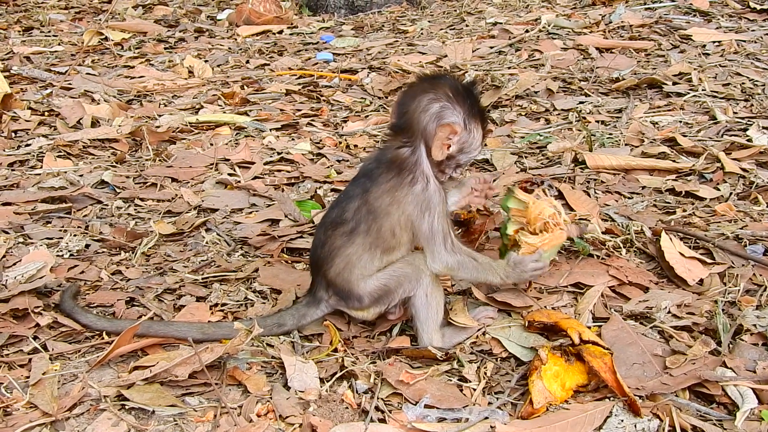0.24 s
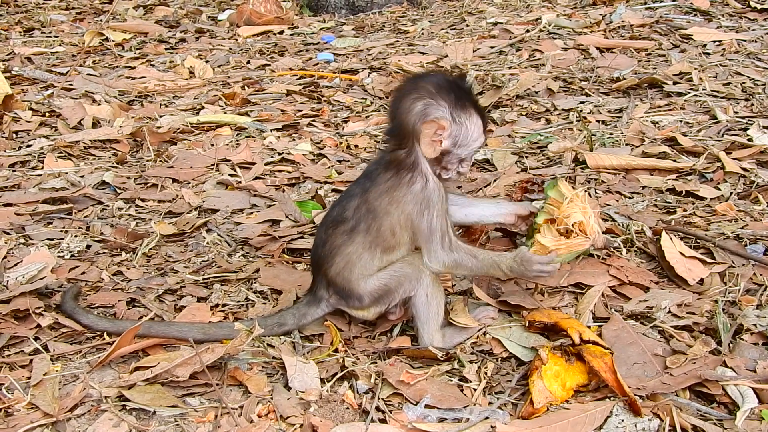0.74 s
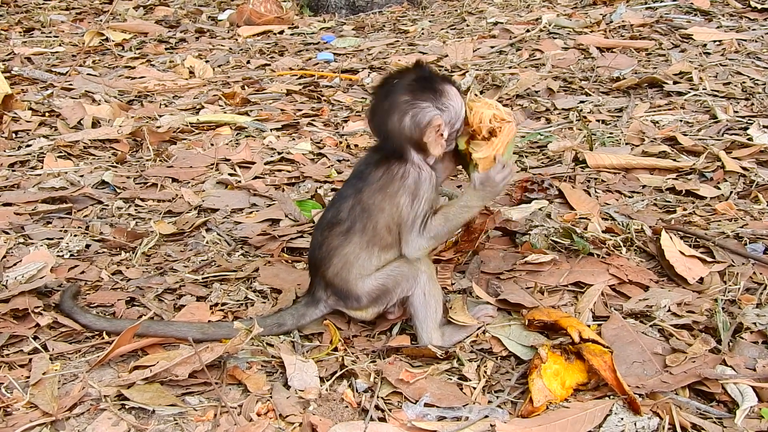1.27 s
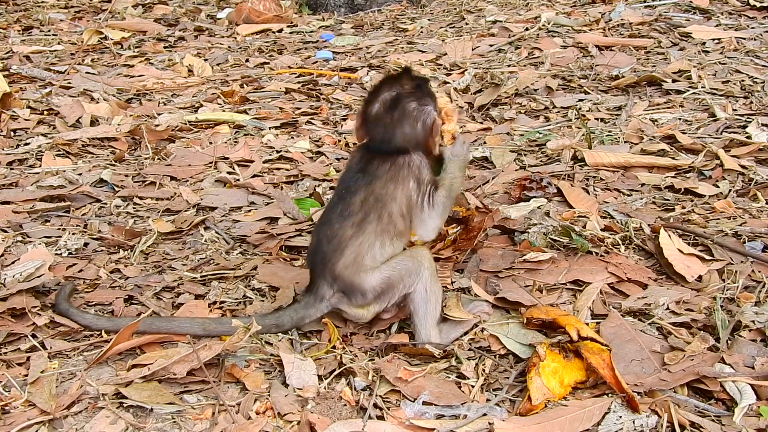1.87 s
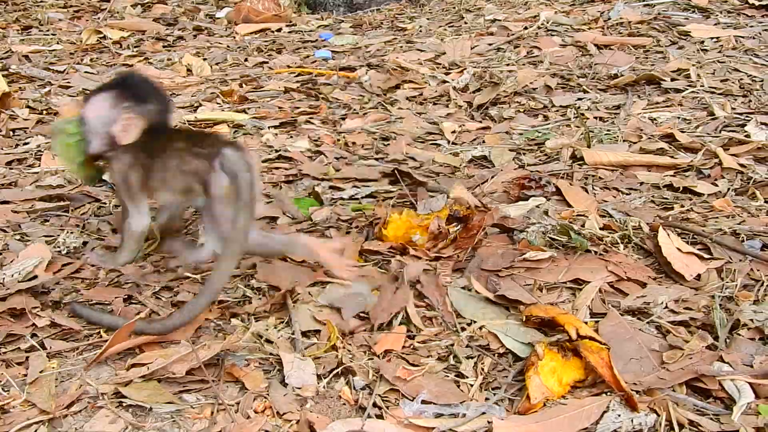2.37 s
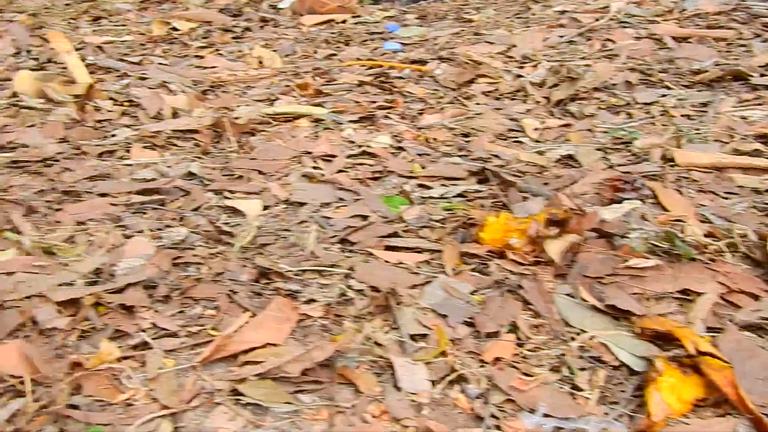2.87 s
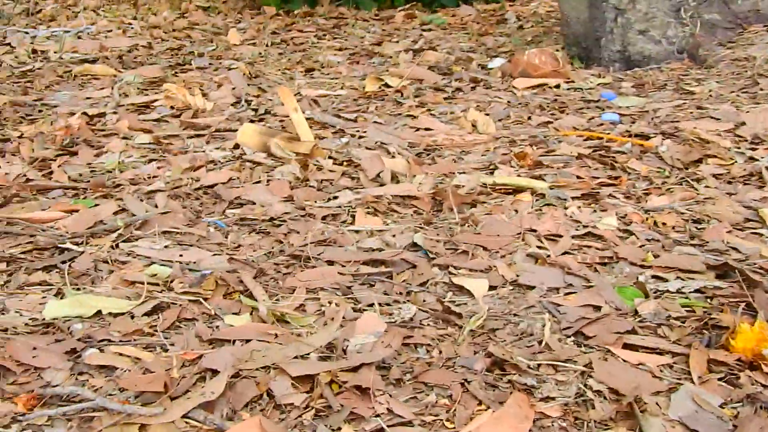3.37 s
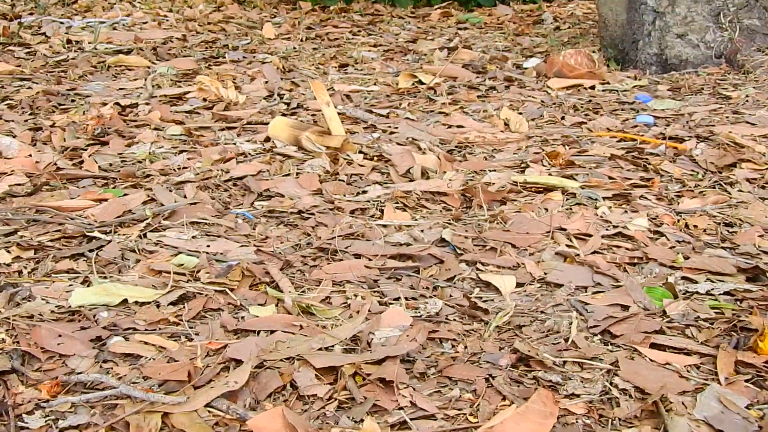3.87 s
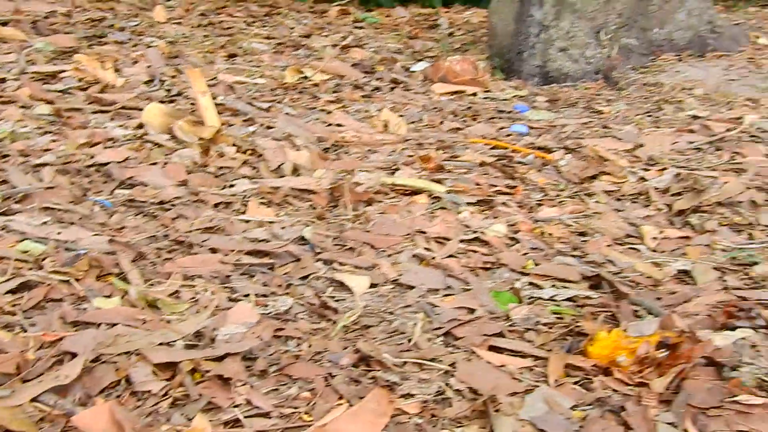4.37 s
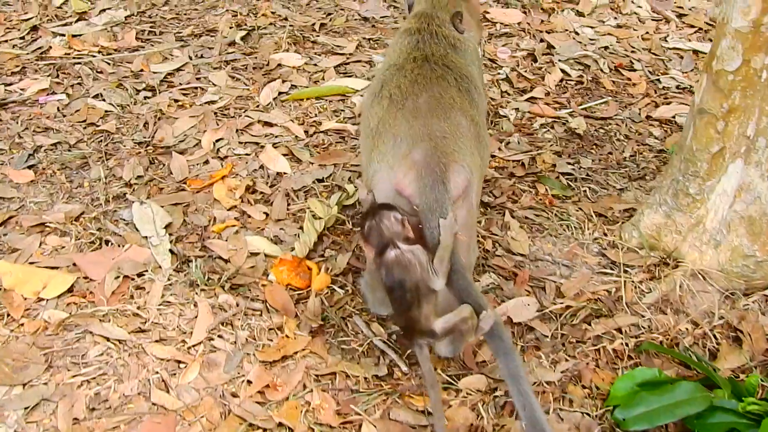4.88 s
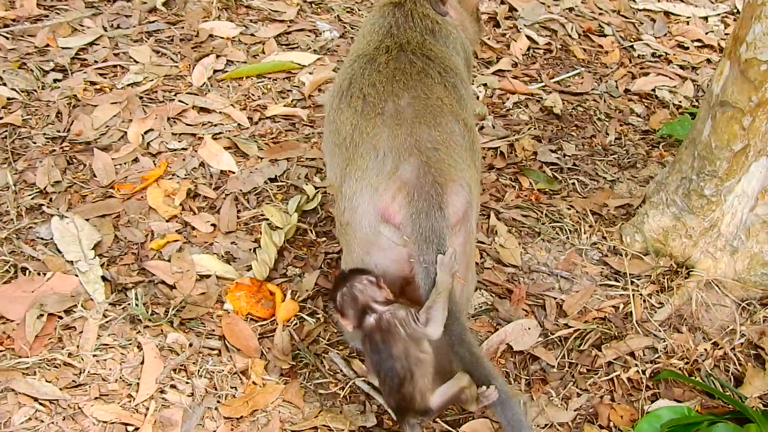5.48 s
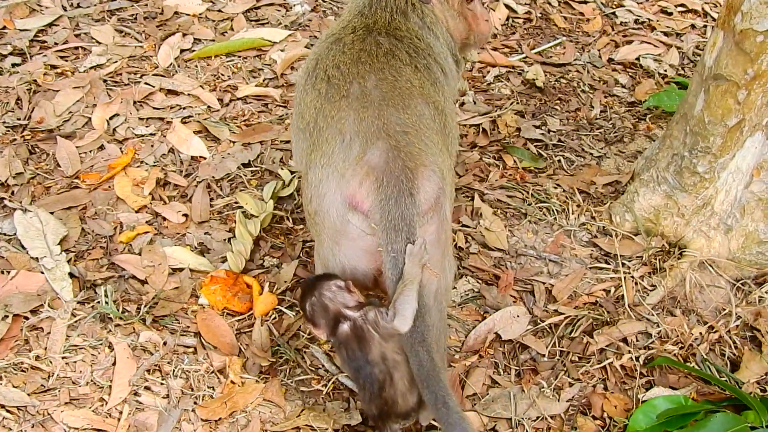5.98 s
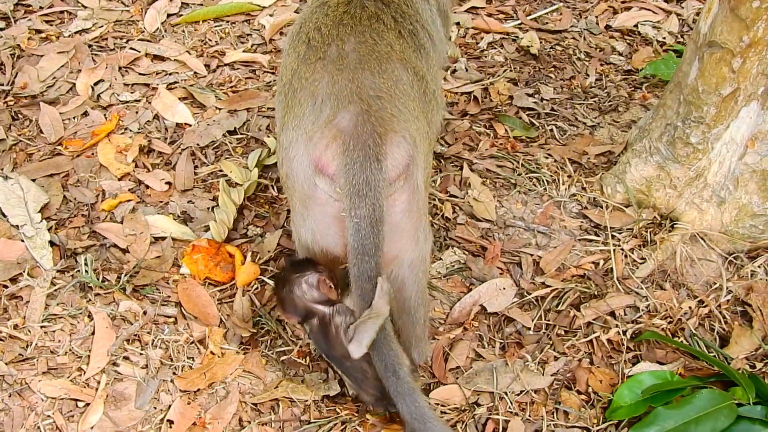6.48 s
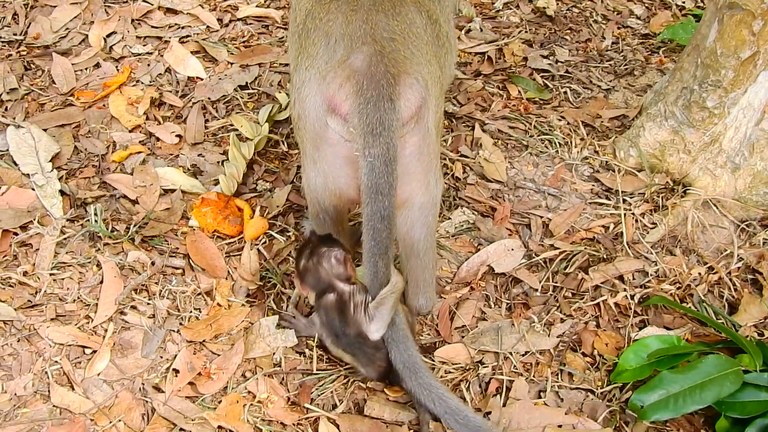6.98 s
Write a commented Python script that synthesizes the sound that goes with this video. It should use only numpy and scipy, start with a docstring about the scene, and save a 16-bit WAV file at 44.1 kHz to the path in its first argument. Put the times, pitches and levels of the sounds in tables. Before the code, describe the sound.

Monkeys scamper over crackling dry leaves near a road, with a thumping motorbike, one short horn toot and a brief dropout.

```python
"""Monkeys in roadside leaves

A single-cylinder motorbike putters through the traffic rumble, each firing thumping its silencer,
louder when the engine labours. A two-note horn toots once and echoes among the trees. Close by,
monkeys scamper and shuffle, crushing and snapping dry leaves, and an insect buzzes briefly.
Everything drops out for half a second, then the bike carries on with a steady low boom."""
import sys
import numpy as np
from scipy import signal
from scipy.fft import rfft, irfft, next_fast_len
from scipy.io import wavfile
from scipy.ndimage import uniform_filter1d, map_coordinates

SR = 44100
rng = np.random.default_rng(int(sys.argv[2]) if len(sys.argv) > 2 else 0)


def transcribe(signal):
    """Save signal, clipped to [-1, 1], as a 16-bit WAV file at the path in sys.argv[1]."""
    frames = np.atleast_2d(signal).T
    limited = np.clip(frames, -1, 1)
    pcm = np.round(limited * 32767).astype(np.int16)
    wavfile.write(sys.argv[1], SR, pcm)


N = 318831

# the engine's firing rate, with a quick drop in pitch just after 2.1 s: (time [s], firing rate [Hz])
REVS = [(0, 36.5), (.92, 33), (1.2, 36), (1.42, 36.2), (1.78, 33), (2.12, 30.6), (2.19, 29.7), (3.5, 30.7),
        (3.98, 31), (4.27, 26.6), (4.78, 34.2), (6.5, 34.8), (6.78, 29.3), (7.2, 28.3)]
# the passing bike's drone at its closest: (multiple of the firing rate, level [dB])
DRONE_PARTIALS = [(2, -32), (4, -35.5), (5, -34.5), (6, -31), (7, -34.5)]
# tone colours, each (frequency [Hz], relative level [dB])
SILENCER_EQ = [(25, -45), (50, -22), (70, -9), (100, 0), (135, 3), (195, -4), (240, -16), (320, -11.5),
               (500, -27), (900, -35.5), (2500, -69.5), (9000, -120)]  # the silencer's resonances
BOOM_EQ = [(25, -12), (55, -6.5), (84, 2), (115, -8), (160, -28.5), (600, -61.5)]  # the part of its thump that booms
BARK_EQ = [(150, -30.5), (260, -6.5), (320, 0.5), (400, -0.5), (470, -1), (680, -5.5), (900, -11.5),
           (1600, -21.5), (4000, -21.5), (12000, -90)]  # the passing engine from nearby
RUMBLE_EQ = [(15, -55), (27, -33), (48, -10.5), (85, -1), (135, 0), (205, -3), (235, -9), (370, -16.5),
             (550, -38.5), (1500, -67.5), (6000, -110)]  # far engines
TYRE_EQ = [(120, -30.5), (250, -1), (380, -0.5), (650, -3), (850, -7), (1350, -10), (1900, -17),
           (3000, -17), (5000, -20.5), (9000, -51.5), (15000, -71.5)]  # tyre roar, also the exhaust puffs
HISS_EQ = [(2500, -31.5), (4000, -11), (5200, -3.5), (6400, 3), (7200, -3.5), (8300, -15.5), (10000, -27),
           (12500, -38), (15700, -51)]  # high hiss
AIR_EQ = [(500, -22.5), (900, -2), (1400, 1.5), (2000, 1), (2700, -0.5), (3900, -4), (5500, -4), (7000, -4),
          (8500, -15), (10500, -27.5), (15700, -44)]  # open air
LEAF_EQ = [(800, -21.5), (2500, -8), (4200, -5), (6400, 3), (7500, 0), (9000, -11.5), (12000, -22.5),
           (15700, -35)]  # crushed dry leaves
SNAP_EQ = [(6500, -0.5), (8500, -7), (12000, -11), (15700, -15.5)]  # the soft top end of a snap
# vehicles rolling by: (closest at [s], passing time [s], tyre level [dB])
PASS_BYS = [(1.58, 0.38, -33.5), (3.15, 0.96, -33), (5.85, .14, -37.5)]
# stereo image, narrow in the bass: (frequency [Hz], left-right likeness [0-1])
STEREO_LIKENESS = [(100, 0.98), (300, 0.99), (700, 0.95), (1400, 0.84), (2800, 0.77), (4500, 0.63),
                   (6500, 0.2), (10000, 0)]
# the road's place in the image: (frequency [Hz], left minus right [dB])
ROAD_PAN = [(40, 2.5), (180, 1.05), (700, 0.5), (1400, 0.7), (2900, 1.5), (5600, 1.9), (10000, -0.5)]
# the horn's two notes: (pitch [Hz], relative level of each harmonic from the first [dB])
HORN_NOTES = [(499.7, [-24.5, 1, -1.5, -2, -4.5, -4.5, -7, -20.5, -11.5, -11, -15, -12, -5.5, -10.5]),
              (424.1, [-22.5, -8.5, -4, -6, 4, -3.5, -3, -12, -12.5, -12, -10, -11.5])]
# reverb among the trees: (frequency [Hz], time to fall 60 dB [s])
TREE_DECAY = [(300, 0.98), (1000, 1.57), (1700, 1.2), (2100, 0.75), (2600, 1.4), (5000, 1.1), (10000, .25)]
# the monkeys' steps and shuffles: (time [s], level [dB], half-width [s])
FOOTFALLS = [(2.36, -40.5, 0.056), (2.5, -37, .04), (2.659, -37, .03), (2.85, -34, .03),
             (2.945, -36.5, 0.019), (3.039, -37.5, .03), (3.183, -37, .025), (3.664, -34.5, .06),
             (4.9, -42, 0.024), (5.144, -42, .03), (5.236, -41.5, .015), (5.678, -43.5, 0.02),
             (5.78, -44.5, 0.055), (6.1, -36.5, .025), (6.723, -39, .05), (6.93, -42, .05)]
# leaves (broad) and twigs (narrow) breaking: (time [s], peak before EQ [dB], pitch [Hz], width [Hz])
LEAF_SNAPS = [(2.471, -12, 6102, 3600), (2.87, -12.5, 6260, 3200), (2.981, -13, 6320, 2400),
              (3.044, -19, 1790, 2000), (3.051, -15, 6330, 2600), (3.296, -19.5, 2200, 1800),
              (3.306, -16, 5001, 1698), (3.782, -18.5, 5850, 1796), (5.118, -20.5, 6300, 2000),
              (5.226, -16.5, 5480, 2200), (5.330, -23, 4600, 1402), (5.397, -21, 4960, 2000)]
# the gap of silence: (start [s], end [s])
SILENCE = (4.28, 4.778)

EXHAUST_DB, APPROACH_DB, LOAD_DB = -31, 7, 2  # far off and coasting; added when near; added at full load
BOOM_DB, LUG_HZ, LUG_WIDTH_HZ = -28.5, 31, 1.2  # the loaded engine booms below this firing rate
STEADY_BOOM_DB = -37.5  # after the silence
RUMBLE_DB, TYRES_DB, HISS_DB = -25, -37.5, -41  # the traffic bed
TOP_HZ = 15760


def amp(db):
    """Decibels to gain."""
    return 10 ** (np.asarray(db) / 20)


def unit(x):
    """x at rms 1."""
    return x / np.sqrt(np.mean(x ** 2) + 1e-20)


def along(points, hz):
    """A (frequency, value) curve read on a log axis."""
    freqs, values = np.transpose(points)
    return np.interp(np.log(hz + 1), np.log(freqs + 1), values)


def wobble(rate):
    """A smooth random curve, rate knots a second."""
    return map_coordinates(rng.standard_normal(int(N * rate / SR) + 4), [np.arange(N) * rate / SR])


def filtered(x, response):
    """x through an EQ whose gain is response(hz)."""
    size = next_fast_len(N + SR // 2)
    return irfft(rfft(x, size) * response(np.fft.rfftfreq(size, 1 / SR)), size)[..., :N]


def rung(x, spectrum, size=16384):
    """x ringing a minimum-phase body with the given spectrum."""
    cepstrum = irfft(np.log(amp(along(spectrum, np.fft.rfftfreq(size, 1 / SR)))))
    cepstrum[1:size // 2] *= 2
    cepstrum[size // 2 + 1:] = 0
    return signal.fftconvolve(x, irfft(np.exp(rfft(cepstrum))))[:N]


def spread(pair, spectrum):
    """Two unrelated signals become a coloured stereo sound of rms 1, near mono in the bass."""
    def mid_side_eq(hz):
        angle = np.arccos(np.clip(along(STEREO_LIKENESS, hz), -1, 1)) / 2
        return amp(along(spectrum, hz)) * [np.cos(angle), np.sin(angle)]
    mid, side = filtered(pair, mid_side_eq)
    return unit(np.array([mid + side, mid - side]))


def rush(spectrum, patchy_db):
    """Coloured stereo noise, mottled with patches of random gain."""
    bands = signal.stft(rng.standard_normal((2, N)), nperseg=512)[2]
    patches = uniform_filter1d(rng.standard_normal(bands.shape[1:]), size=6, axis=0)
    patches = unit(uniform_filter1d(patches, size=14, axis=1))
    return spread(signal.istft(bands * amp(patchy_db * patches))[1][:, :N], spectrum)


def nearness(closest_s, passing_s):
    """Pass-by gain of a source on a straight road, 1 at its closest."""
    return 1 / (1 + ((np.arange(N) / SR - closest_s) / passing_s) ** 2)


def tree_reverb(x, length_s=1.2):
    """The trees scatter x into two diffuse tails; the top end dies first."""
    hz, t, bands = signal.stft(rng.standard_normal((2, int(length_s * SR))), SR, nperseg=256)
    tail = signal.istft(bands * amp(-60 * t / along(TREE_DECAY, hz)[:, None]))[1]
    return signal.fftconvolve(x[None], tail, axes=1)[:, :N]


def engine_load(rate, full_sag_hz_per_s=3.6):
    """From -1 to 1: the engine runs light while its revs climb and labours while they sag."""
    sag = -np.gradient(rate) * SR
    return uniform_filter1d(np.clip(sag / full_sag_hz_per_s, -1, 1), size=SR // 10)


def silencer_boom(thumps, rate, load):
    """The thumps bloom in the bass when the engine lugs; after the silence some boom always carries."""
    lugging = np.maximum(load, 0) / (1 + np.exp((rate - LUG_HZ) / LUG_WIDTH_HZ))
    steady = np.arange(N) / SR > SILENCE[0]
    gain = np.hypot(amp(BOOM_DB) * lugging, amp(STEADY_BOOM_DB) * steady)
    return gain * unit(filtered(thumps, lambda hz: amp(along(BOOM_EQ, hz))))


def motorbike(scatter_db=2.0, jitter_s=.00015, puff_db=-18, puff_depth=1.1, bark_db=-30, roar_db=-33.5):
    """Each firing thumps the silencer and puffs gas, harder under load; a second bike drones and barks as it
    passes close by, its partials following the same firing rate."""
    rate = np.interp(np.arange(N) / SR, *np.transpose(REVS))
    load = engine_load(rate)
    cycles = np.cumsum(rate) / SR
    firings = np.flatnonzero(np.diff(np.floor(cycles)))
    timing, strength = rng.standard_normal((len(firings), 2)).T
    onsets = np.clip(firings + jitter_s * SR * timing, 0, N - 1).astype(int)
    pulses = np.bincount(onsets, amp(scatter_db * strength), N)
    puffs = unit(rush(TYRE_EQ, patchy_db=0.5) * np.exp(puff_depth * np.sin(2 * np.pi * cycles)))
    thumps = -unit(rung(pulses, SILENCER_EQ))
    effort = amp(EXHAUST_DB + APPROACH_DB * nearness(closest_s=2.55, passing_s=1.43) + LOAD_DB * load)
    exhaust = effort * (thumps + amp(puff_db) * puffs)
    drone = sum(amp(db + 1.5 * wobble(5)) * np.sin(2 * np.pi * (k * cycles + rng.random()))
                for k, db in DRONE_PARTIALS)
    drone *= np.sqrt(2) * nearness(closest_s=3.23, passing_s=0.99)
    # scattered by the trees, the firings blur into a buzz
    buzz = amp(bark_db) * spread(tree_reverb(pulses), BARK_EQ)
    roar = amp(roar_db) * rush(BARK_EQ, patchy_db=2)
    bark = (buzz + roar) * nearness(closest_s=3.5, passing_s=0.56)
    return exhaust + silencer_boom(thumps, rate, load) + drone + bark


def traffic(air_db=-38.0, swell_db=-33.0):
    """Far engines merge into a throbbing bed under passing tyres, open air and a hiss that swells once."""
    rumble = amp(RUMBLE_DB) * unit(rush(RUMBLE_EQ, patchy_db=0.4) * amp(0.91 * wobble(45)))
    pass_power = sum((amp(db) * nearness(at_s, passing_s)) ** 2 for at_s, passing_s, db in PASS_BYS)
    rolling = np.sqrt(amp(TYRES_DB) ** 2 + pass_power)
    tyres = rolling * amp(0.64 * wobble(12)) * rush(TYRE_EQ, patchy_db=1.5)
    swell = amp(HISS_DB) + amp(swell_db) * nearness(closest_s=2.83, passing_s=1.2)
    hiss = swell * amp(0.63 * wobble(14)) * rush(HISS_EQ, patchy_db=1.3)
    return rumble + tyres + hiss + amp(air_db) * rush(AIR_EQ, patchy_db=1.5)


def horn(start_s=1.41, stop_s=1.498, attack_s=.018, release_s=.01, plate_hz=2120, lead_s=.018, rasp=.008):
    """Two buzzing diaphragms sound together for one short, raspy toot."""
    span = slice(round((start_s - .05) * SR), round((stop_s + .15) * SR))
    t, toot = np.arange(N)[span] / SR, np.zeros(N)
    release = np.exp(-np.maximum(t - stop_s, 0) / release_s)
    for pitch_hz, levels in HORN_NOTES:
        harmonic = np.arange(len(levels))[:, None] + 1
        wavering_hz = pitch_hz * (1 + 0.00301 * wobble(70.27) + rasp * wobble(600))
        phase = 2 * np.pi * np.cumsum(wavering_hz)[span] / SR
        # the harmonic on the plate's resonance speaks first
        onset = start_s - lead_s * np.exp(-((harmonic * pitch_hz - plate_hz) / 90) ** 2)
        attack = np.clip((t - onset) / attack_s, 0, 1)
        toot[span] += amp(levels) @ (attack * release * np.sin(harmonic * phase))
    return toot


def among_trees(toot, dry_db=-33, wet_db=-34, width=.45, slap_s=.15, slap_db=-11.5, pan_db=2):
    """The toot arrives from the left, slaps back once and lingers among the trees."""
    mid, side = unit(tree_reverb(toot)) * toot.std()
    tail = np.array([mid + width * side, mid - width * side])
    slap = amp(slap_db) * np.roll(toot, round(slap_s * SR))
    pan = np.sqrt(2) * amp([[pan_db / 2], [-pan_db / 2]])
    return pan * (amp(dry_db) * (toot + slap) + amp(wet_db) * tail)


def monkey_rustle(stir_db=-49.5, stir_from_s=2.1, fidget_db=6.0, crackle_db=3.5):
    """Each step crushes a cloud of tiny cracks out of the dry leaves; between steps they stir at random."""
    t = np.arange(N) / SR
    stir = amp(stir_db + fidget_db * wobble(7)) * np.clip(t - stir_from_s, 0, 1)
    steps = sum(amp(db) * np.exp(-.5 * ((t - at_s) / width_s) ** 2) for at_s, db, width_s in FOOTFALLS)
    cracks = rng.standard_normal((2, N)) * (rng.random((2, N)) < .3)
    return (stir + steps) * spread(cracks * amp(crackle_db * wobble(250)), LEAF_EQ)


def leaf_snaps(t60_s=0.023, pan_db=0.5):
    """A breaking leaf or twig gives a short burst around its own pitch, soft in the top end."""
    out, t = np.zeros((2, N + SR)), np.arange(SR // 20) / SR
    hz = np.fft.rfftfreq(len(t), 1 / SR)
    pan = amp([[pan_db / 2], [-pan_db / 2]])
    for at_s, db, pitch_hz, width_hz in LEAF_SNAPS:
        noise = rng.standard_normal((3, len(t))) * amp(-60 * t / t60_s)
        burst = noise[:2] + noise[2]  # one noise per ear, one shared
        resonance = 1j * hz * width_hz / (pitch_hz ** 2 - hz ** 2 + 1j * hz * width_hz)
        crack = irfft(rfft(burst) * resonance ** 2, len(t))
        start = round(at_s * SR)
        out[:, start:start + len(t)] += amp(db) * pan * crack / np.abs(crack.mean(0)).max()
    return filtered(out[:, :N], lambda hz: amp(along(SNAP_EQ, hz)))


def insect(at_s=3.25, swell_s=.06, pitch_hz=11850, width_hz=280, level_db=-61.0):
    """A thin, very high buzz swells and fades."""
    noise = rng.standard_normal((2, N))
    buzz = unit(filtered(noise, lambda hz: np.exp(-((hz - pitch_hz) / width_hz) ** 2)))
    return amp(level_db) * buzz * np.exp(-.5 * ((np.arange(N) / SR - at_s) / swell_s) ** 2)


def scene():
    """The road sits a little to the left; the leaves are in the foreground."""
    road = motorbike() + traffic() + among_trees(horn())
    road = filtered(road, lambda hz: amp(np.outer([.5, -.5], along(ROAD_PAN, hz))))
    return road + monkey_rustle() + leaf_snaps() + insect()


def record(dry, fade_s=.003):
    """The mix mutes for half a second, and a steep high cut takes off the very top."""
    t = np.arange(N) / SR
    gate = np.clip(np.maximum(SILENCE[0] - t, t - SILENCE[1]) / fade_s, 0, 1)
    return filtered(dry * gate, lambda hz: hz < TOP_HZ)


dry = scene()
out = record(dry)
transcribe(out)
```